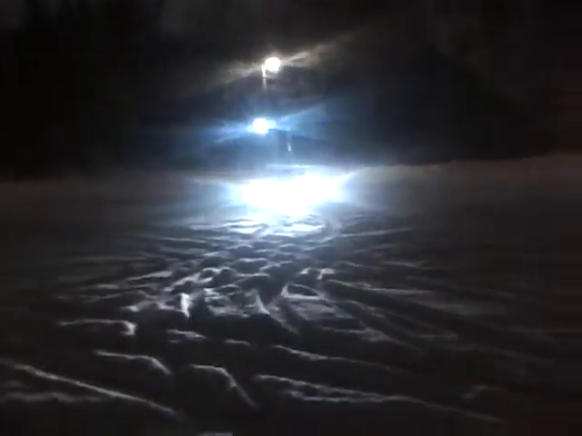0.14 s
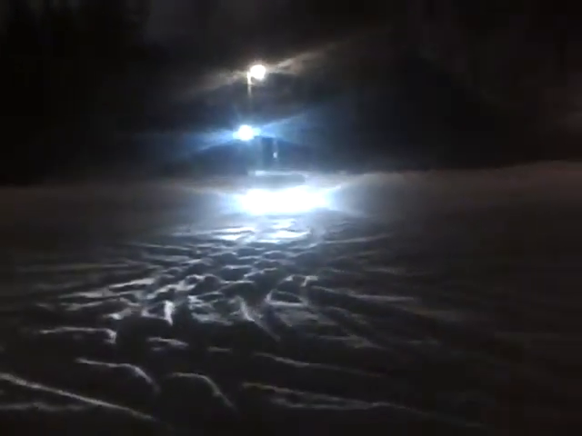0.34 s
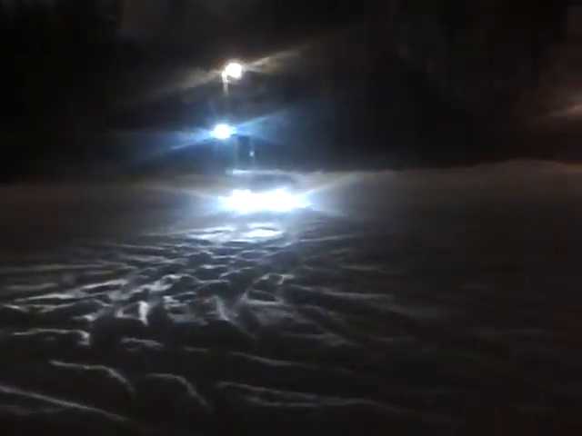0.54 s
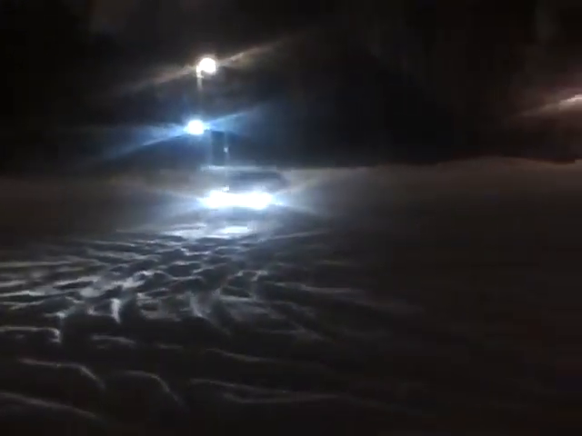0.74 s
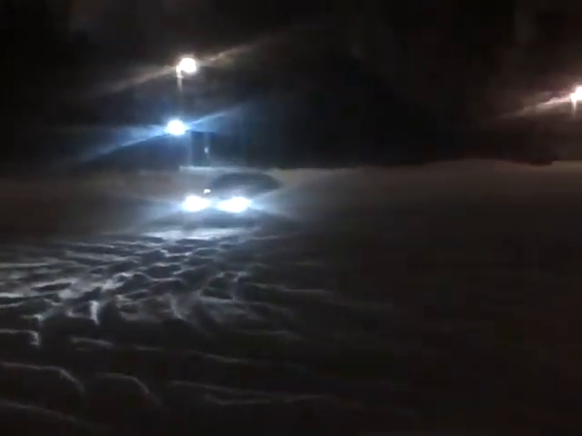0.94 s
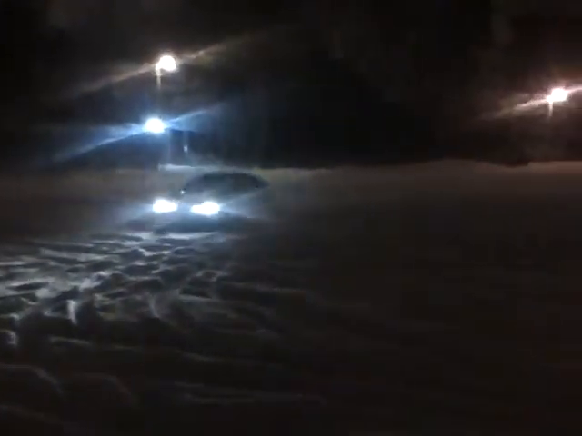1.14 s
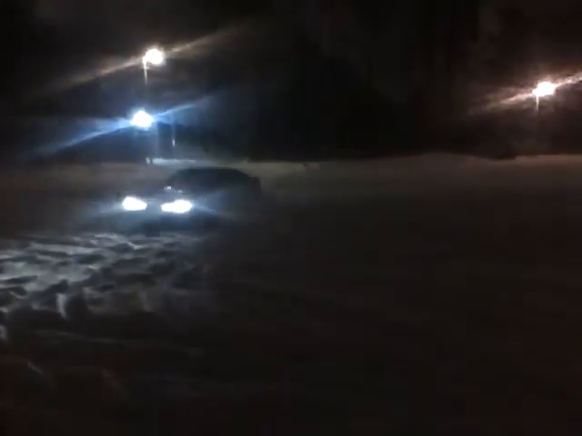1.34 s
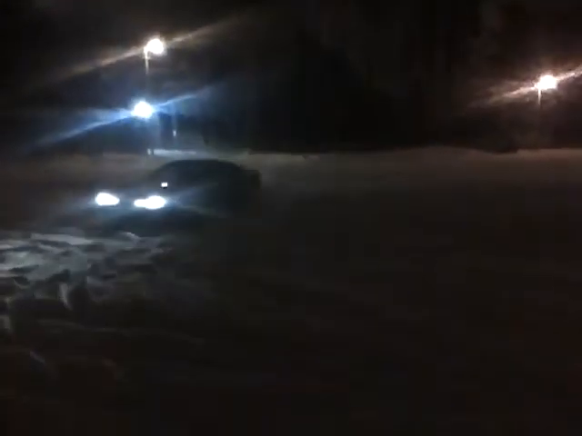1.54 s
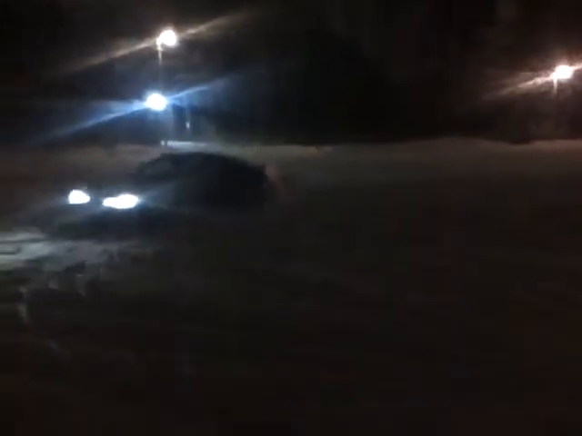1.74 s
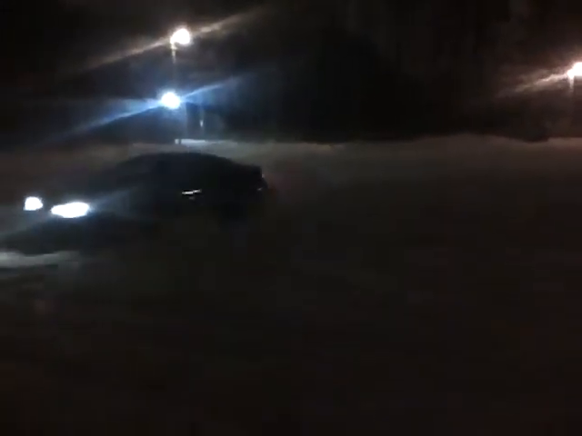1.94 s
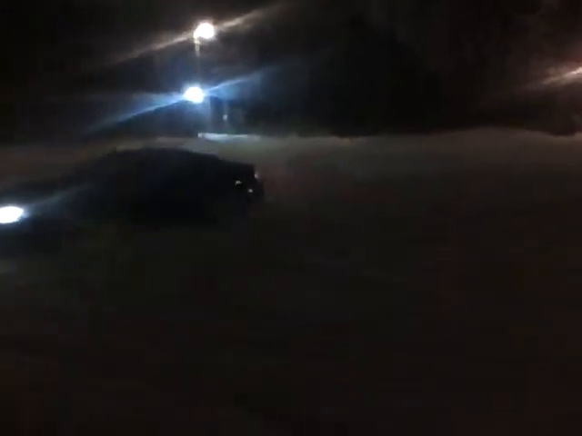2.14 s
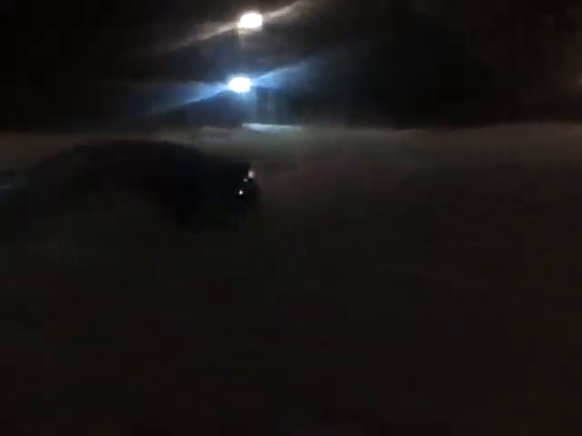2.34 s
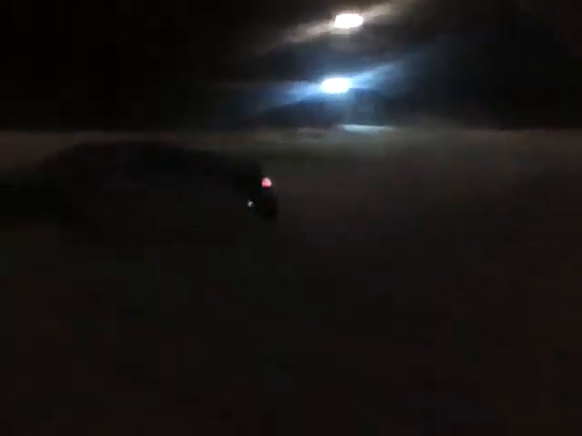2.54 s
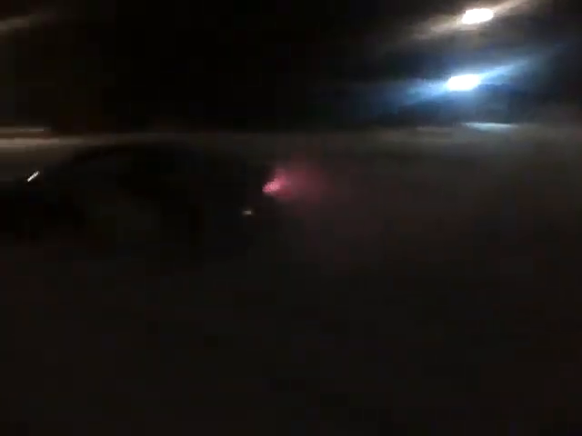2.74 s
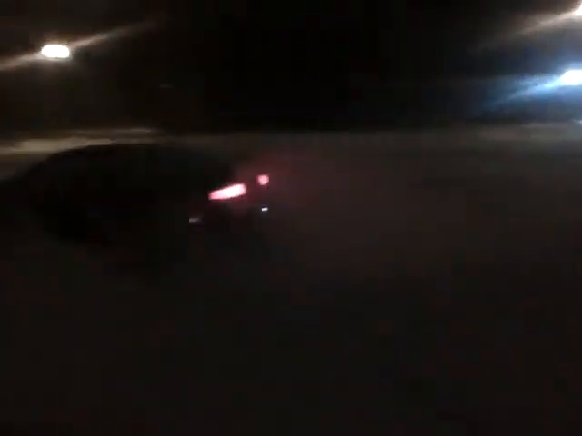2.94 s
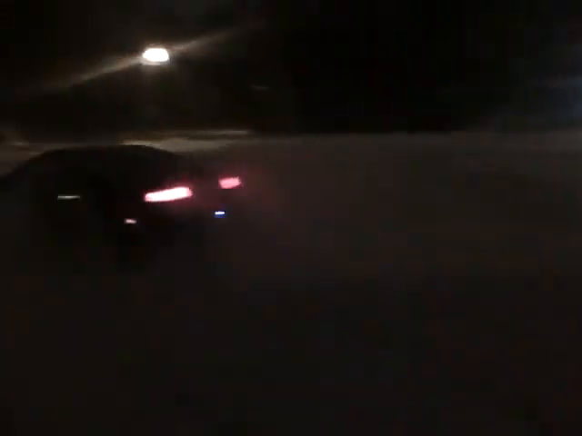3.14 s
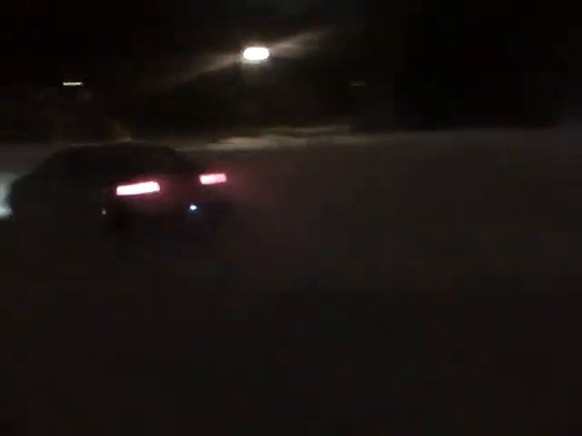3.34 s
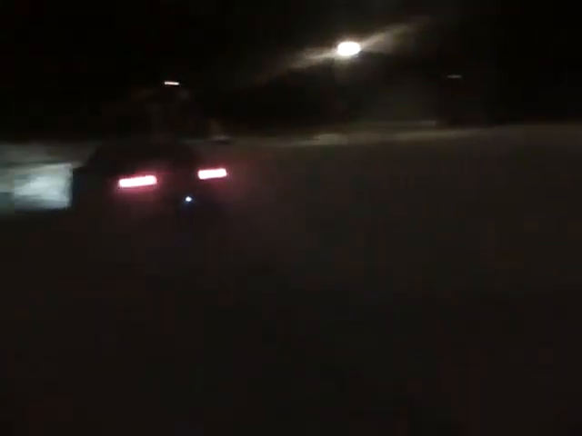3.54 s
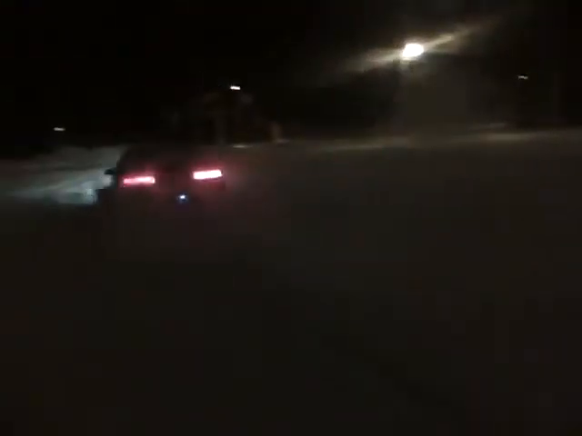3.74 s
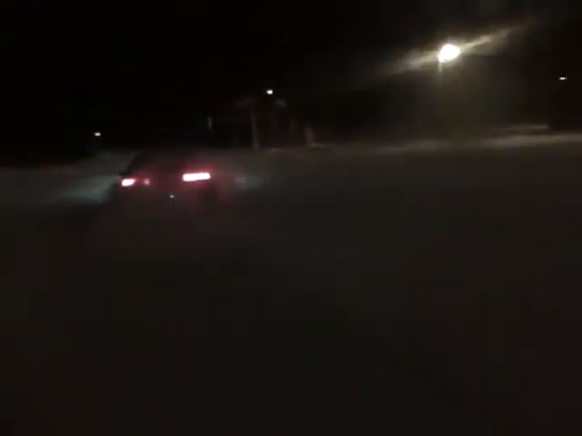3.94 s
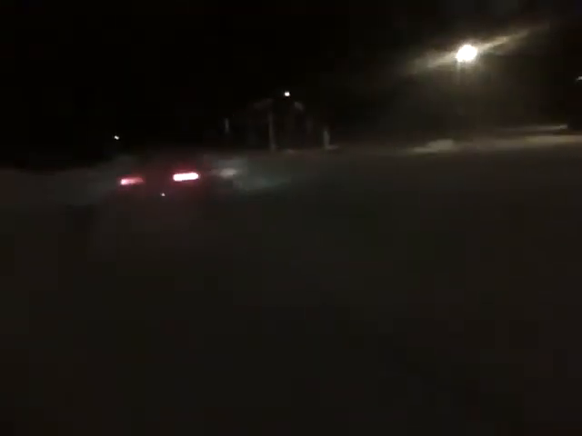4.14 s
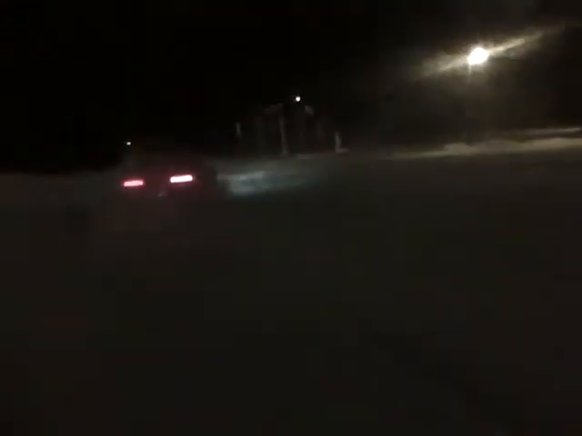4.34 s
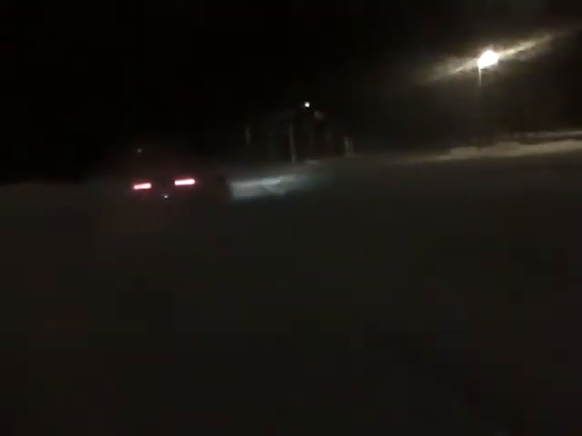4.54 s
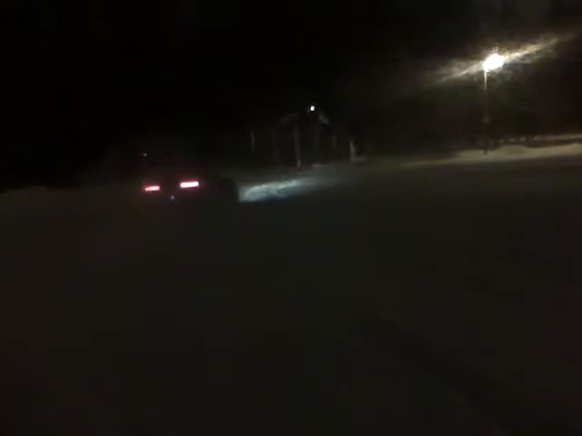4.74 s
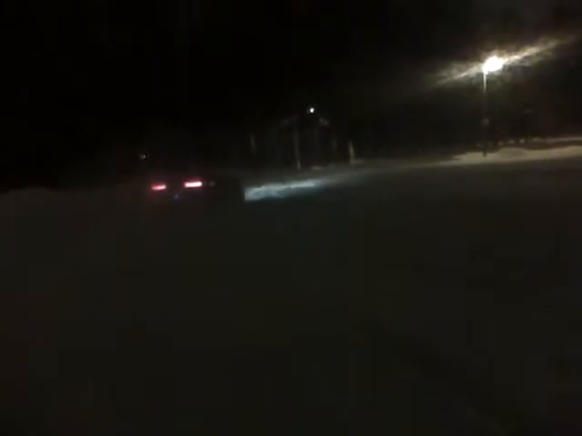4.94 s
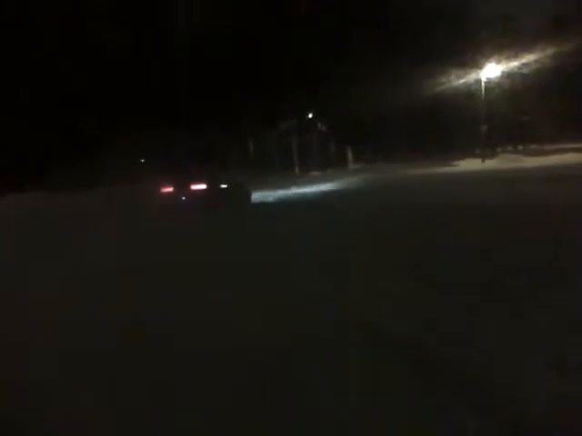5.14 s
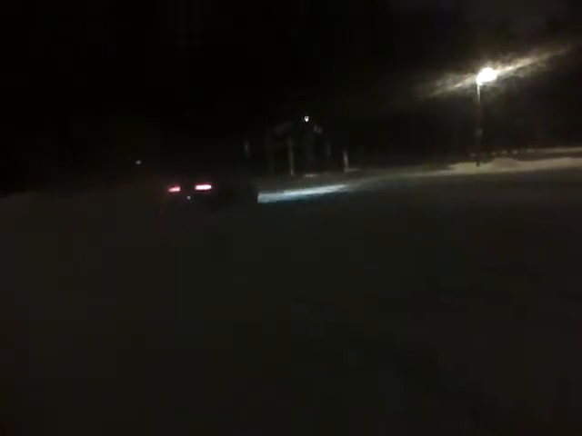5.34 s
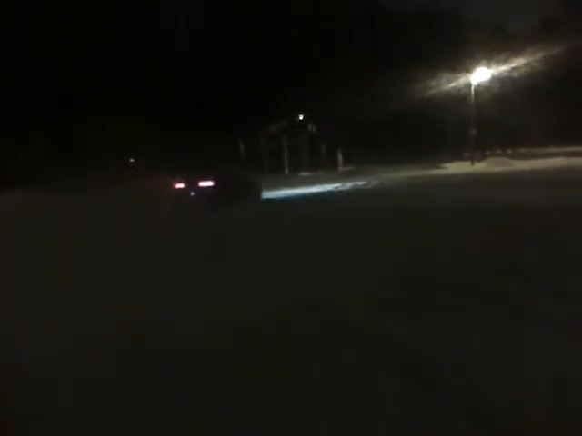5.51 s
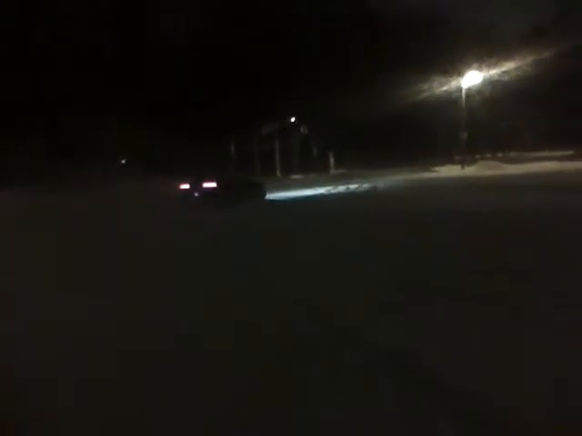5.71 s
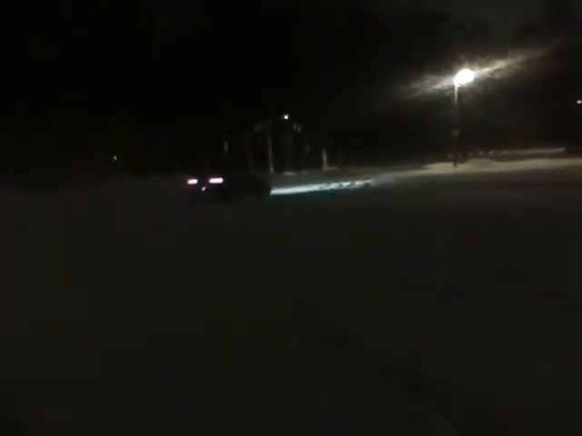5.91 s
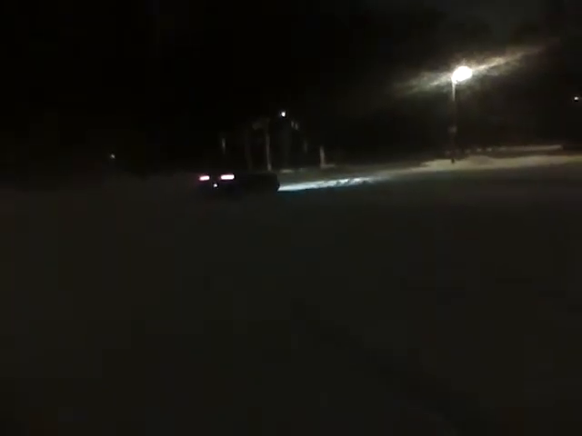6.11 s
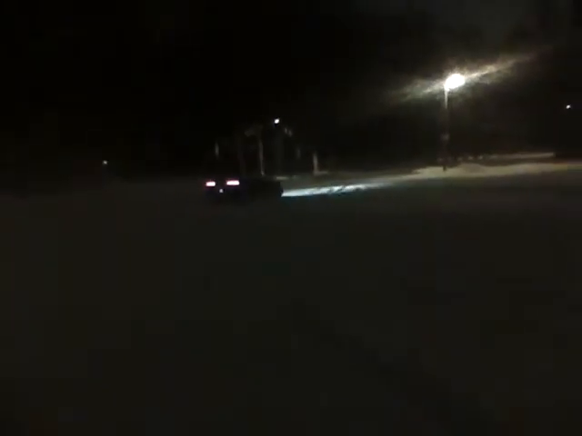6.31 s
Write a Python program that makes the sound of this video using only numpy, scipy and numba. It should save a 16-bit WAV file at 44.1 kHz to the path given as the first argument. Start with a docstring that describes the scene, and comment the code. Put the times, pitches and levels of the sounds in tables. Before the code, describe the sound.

Uneven four-cylinder engine hum climbs with roaring tyre hiss, sags to a deep raspy exhaust drone, flutters its turbo and dwindles away.

```python
"""An uneven exhaust hum under a steady microphone hiss: a turbocharged four-cylinder car on a snowy lot at
night, heard nose on, then tail on, then away. Multiples of the firing rate make the hum, which stumbles and
scatters off throttle; noise puffed once a firing rings as exhaust rasp and as the hiss of intake and spinning
tyres. Chopped noise in a moving band is the turbo whistle; soft thumps and small ticks come singly.
Low rumble lies behind, and a small microphone colours it all."""
import sys
import numpy as np
from scipy import signal
from scipy.fft import rfft, irfft
from scipy.io import wavfile
from scipy.ndimage import uniform_filter1d
from numba import njit

SR = 44100
rng = np.random.default_rng(int(sys.argv[2]) if len(sys.argv) > 2 else 0)


def inscribe(sig):
    """Save sig as 16-bit PCM at rate SR to the path in sys.argv[1].

    A 1-D sig is mono; a 2-D sig holds one channel per row.
    Samples are clipped to [-1, 1] before scaling.
    """
    pcm = np.round(np.clip(np.atleast_2d(sig).T, -1, 1) * 32767)
    wavfile.write(sys.argv[1], SR, pcm.astype(np.int16))


N = 285327
LIFT_S = 4.57  # the throttle shuts

# Partials of the hum, as multiples of the firing rate.
MULTIPLES = (.5, 1, 1.5, 2, 2.5, 3, 4)
# Weak or strong firings. Each row: time in seconds, change of strength as a share of the normal one,
# strength of the thump in relative dB.
STUMBLES = [(1.799, -0.98, -25), (1.813, 0.9, -26), (1.823, -1.1, -21), (1.829, .6, -36),
            (1.844, -0.76, -37), (2.435, 0.16, -32), (2.446, -0.46, -31), (2.457, 0.79, -26),
            (2.472, -0.42, -39), (2.479, -0.18, -29), (2.491, 0.37, -47), (2.51, -0.83, -37),
            (2.542, 0.94, -23), (4.915, 0.3, -34), (5.162, 0.61, -38), (5.3, 0.6, -41),
            (6.063, 0.83, -39.5)]
# Voices of the engine. Each holds: seven levels in dB over the hum, one per multiple, before the pipe;
# unevenness 0-1; rasp in dB over the exhaust gas; fine hiss in dB over the intake roar.
NOSE_ON = (-65, -0.5, -15.5, -12, -35, -29.5, -44.5, 0.2343, 0, 1.8)
PULLING = (-16.5, -1.5, -23.5, -13, -23, -18.5, -20.5, 0.43, -9.5, -0.5)
SPINNING = (-10, -1.7, -6.5, -9.5, -33, -22, -42, 0.46, -0.7, -0.5)
STUMBLING = (-6, -2, -14.5, -24, -38, -42, -38, 0.65, -1.2, 0.8)
SLOWING = (-32, -1.5, -19.5, -13.5, -26.5, -32, -43, 0.2, -1, -.2)
LIFTING = (-30, -2.5, -12.5, -10.5, -30, -14.5, -39, 0.32, -4, -2.5)
FADING = (-22, -1, -7, -7, -10, -27, -16.5, 0.48, -7, -1)
TAIL_ON = (-26, -6.5, -13, -3.5, -14.5, -14.5, -29.5, 0.14, 1, -6.5)
TAIL_FAR = (-41, -7.5, -13, -3.5, -16.5, -13.5, -25, 0.17, -6, -11.5)
COASTING = (-30, -2, -8, -3.5, -7.5, -13.5, -54, 0.38, -4, -4)


def undb(db):
    """Gain of a level in dB."""
    return 10 ** (np.asarray(db) / 20)


def unit(x):
    """Scaled to rms 1."""
    return x / np.sqrt(np.mean(x ** 2))


def curves(table):
    """Columns of a table, joined by straight lines in time."""
    s, *columns = np.transpose(table)
    return [np.interp(np.arange(N) / SR, s, column) for column in columns]


@njit
def svf(x, hz, width):
    """State-variable band-pass with a moving centre, gain 1 at the centre."""
    y, band_state, low_state = np.empty(len(x)), 0., 0.
    for i in range(len(x)):
        g, damping = np.tan(np.pi * hz[i] / SR), width / hz[i]
        v = (band_state + g * (x[i] - low_state)) / (1 + g * (g + damping))
        band_state = 2 * v - band_state
        low_state = low_state + 2 * g * v
        y[i] = damping * v
    return y


def band(x, hz, width_hz):
    """A resonance applied twice for steep skirts; the width is that of one pass."""
    hz = hz * np.ones(N)
    once = svf(x + 1e-18, hz, float(width_hz))
    return svf(once, hz, float(width_hz))


def ring(x, modes):
    """Sound through a set of resonances of alternating sign, rms 1."""
    total = np.zeros(N)
    for k, (hz, width_hz, db) in enumerate(modes):
        total += (-1) ** k * undb(db) * unit(band(x, hz, width_hz))
    return unit(total)


def noise():
    """White noise."""
    return rng.standard_normal(N)


def walk(rate):
    """Random levels held 1 / rate s and smoothed twice; spread about 0.65."""
    k = int(SR / rate)
    held = np.repeat(rng.standard_normal(N // k + 1), k)
    return 0.95 * uniform_filter1d(uniform_filter1d(held, k), k)[:N]


def clicks(times, sizes):
    """Silence with single clicks."""
    out = np.zeros(N)
    out[(np.asarray(times) * SR).astype(int)] = sizes
    return out


def firing_starts(cycle):
    """One where a new firing begins, else zero."""
    return np.diff(cycle, prepend=0)


def hum(turns, levels_db, uneven):
    """Multiples of the firing rate; each firing has its own strength and timing, and misfires leave holes."""
    # Silencer modes. Each row: centre in Hz, width in Hz, relative level in dB.
    burble_modes = [(127.45, 175, -7), (270, 250, -11), (353, 113, -7.5)]
    t = np.arange(N) / SR
    chance = rng.standard_normal((1200, 2))
    strength = 1 + 0.37 * uneven * np.interp(turns, np.arange(1200), chance[:, 0])
    late = 0.09 * uneven * np.interp(turns, np.arange(1200), chance[:, 1])  # in firings
    for s, change, _ in STUMBLES:
        strength = strength * (1 + change * np.exp(-((t - s) / 0.0031) ** 2))
    # off throttle the cylinders keep no fixed pattern, so the half multiples fade and smear
    pattern = np.where(t < LIFT_S, 1, .4 * walk(30))
    tone = np.zeros(N)
    for m, db in zip(MULTIPLES, levels_db):
        # each multiple leaves the pipe with its own phase
        partial = np.cos(2 * np.pi * m * (turns + late) - 0.83 * m ** 2)
        tone += undb(db) * (pattern if m % 1 else 1) * partial
    # uneven running also lets the hum swell and sag
    strength = strength * undb(5 * np.clip(uneven, 0, .25) * walk(12))
    # and firings of random strength burble in the silencer
    cycle = np.floor(turns).astype(int)
    burble = ring(firing_starts(cycle) * chance[cycle, 0], burble_modes)
    return np.sqrt(2) * strength * tone + 0.54 * uneven * undb(levels_db[3]) * burble


def firing_puffs(cycle, turns):
    """Gas escapes in decaying puffs, one a firing, slightly stronger every other firing on average."""
    size_db = 3.4 * rng.standard_normal(1200) - 0.32 * (np.arange(1200) % 2)
    return undb(size_db)[cycle] * np.exp(-(turns % 1) / .3)


def firing_pulses(cycle, turns, lopsided):
    """Pressure clicks, one a firing; the four cylinders reach the pipe unevenly."""
    # Each row, one cylinder: strength in dB, lateness in firings when strong and weak alternate fully.
    cylinders = [(0, 0), (-1, .06), (0, .12), (-2, .18)]
    lopsided = np.clip(lopsided, 0, 1)
    pulses = firing_starts(cycle) * undb(.8 * rng.standard_normal(1200)[cycle])
    pulses = pulses * (1 + lopsided * (-1) ** cycle)
    at = np.flatnonzero(pulses)[1:-1]
    own_db, late = np.transpose(cylinders)[:, cycle[at] % 4]
    rate_hz = np.gradient(turns)[at] * SR
    return clicks(at / SR + late * lopsided[at] / rate_hz, pulses[at] * undb(own_db))


def tailpipe(puff, pulses, buzz_db, bark_db):
    """Puffed gas noise barks in the tailpipe, and the pulses ring the pipe to a buzz."""
    # Both, each row: centre in Hz, width in Hz, relative level in dB.
    bark_modes = [(490, 260, -0.5), (670, 310, 1), (830, 347, 5.5)]
    buzz_modes = [(599.4, 84, 6), (714, 77, 4), (804, 88, 6.5), (924, 51, -0.5), (1280, 310, -1)]
    bark = ring((0.36 + puff) * noise(), bark_modes)
    return undb(bark_db) * bark + undb(buzz_db) * ring(pulses, buzz_modes)


def rasp(puff, pulses):
    """Gas noise, swelling with each puff, and pulses in two higher resonances."""
    # Each row: centre in Hz, width in Hz, relative level in dB.
    rasp_modes = [(1288, 420, 8), (1654, 460, 1.5)]
    return ring((1.9 + puff) * noise(), rasp_modes) + .5 * ring(pulses, rasp_modes)


def intake_roar(puff, pulses):
    """Roar of intake and tyres: wavering noise, swelling with each puff, and pulses in resonances."""
    # Each row: centre in Hz, width in Hz, relative level in dB.
    intake_modes = [(2091, 225, 1), (2325, 166, -1), (2610, 335, -2.5)]
    roar = ring((0.87 + puff) * undb(3.3 * walk(22.1)) * noise(), intake_modes)
    return roar + .4 * ring(pulses, intake_modes)


def fine_hiss(puff):
    """The treble of intake and tyres: wavering broad noise, barely chopped by the firings."""
    # Each row: centre in Hz, width in Hz, relative level in dB.
    fine_modes = [(3090, 1200, 3), (4320, 2700, -2.5), (5900, 2950, 0.5), (10170, 4300, -11)]
    return ring((7.7 + puff) * undb(1.6 * walk(20)) * noise(), fine_modes)


def night():
    """Steady hiss of the microphone and a low, swelling rumble of air and town."""
    # Shape of the hiss. Each row: frequency in Hz, relative level in dB per Hz.
    hiss_shape = [(310, -26), (520, 1), (1050, -9), (1820, -8), (2170, -12.5), (2880, -11.5), (11000, -15),
                  (14300, -52), (22000, -120)]
    hiss_db, rumble_db = -59.5, -56
    hz = np.maximum(np.arange(N // 2 + 1) * SR / N, 1)
    at, db = np.transpose(hiss_shape)
    hiss = irfft(rfft(noise()) * undb(np.interp(np.log(hz), np.log(at), db)), N)
    low, upper = unit(band(noise(), 55, 90)), unit(band(noise(), 221, 135))
    rumble = undb(walk(2.78)) * (low + 2.06 * upper)
    return undb(hiss_db) * unit(hiss) + undb(rumble_db) * rumble


def thumps():
    """Unburnt charge pops softly in the silencer."""
    s, _, db = np.transpose(STUMBLES)
    push = clicks(s, undb(db))
    return 60 * (band(push, 130, 70) + 2.6 * band(push, 253, 123))


def whistle_bursts():
    """Centre in Hz and gain of the whistle: each burst rises, holds and falls."""
    # Each row: start in seconds, length in seconds, centre in Hz, relative level in dB.
    burst_rows = [(3.34, .06, 4730, -52), (3.47, 0.11, 5210, -46.5), (4.06, 0.018, 5470, -58),
                  (4.68, 0.094, 5740, -66), (4.79, 0.091, 6050, -62), (4.88, .08, 5570, -56.5),
                  (4.985, .035, 5500, -59.5), (5.055, .04, 5524, -60), (5.1, 0.13, 5280, -61.5),
                  (5.255, 0.025, 5070, -62)]
    rush_edge_s, chirp_edge_s = 0.18, 0.015  # rise and fall under boost, after the lift
    sag_hz_per_s = 1500  # fall of pitch within each burst after the lift
    t, gain = np.arange(N) / SR, np.zeros(N)
    hz = np.full(N, float(burst_rows[0][2]))
    for s, length, centre_hz, db in burst_rows:
        edge = rush_edge_s if s < LIFT_S else chirp_edge_s
        inside = np.minimum(t - s, s + length - t)  # negative outside the burst
        gain = np.maximum(gain, undb(db) * np.clip(1 + inside / edge, 0, 1) ** 2)
        since = t[t > s - edge / 2] - s - length / 2
        hz[N - len(since):] = centre_hz - (s > LIFT_S) * sag_hz_per_s * np.minimum(since, length)
    return uniform_filter1d(hz, size=400), gain


def turbo_whistle(puff):
    """Noise chopped by the firings: a broad rush under boost, thin falling chirps after the lift."""
    hz, gain = whistle_bursts()
    chopped = (.15 + puff) * noise()
    rush = unit(band(chopped, hz, 1500)) + .3 * unit(band(chopped, 1.42 * hz, 2400))
    chirp = unit(band(chopped, hz, 920))
    return gain * np.where(np.arange(N) < LIFT_S * SR, rush, chirp)


def ticks():
    """Small ticks of snow crust or hot exhaust: short decaying bursts of broad noise."""
    # Each row: time in seconds, relative level in dB.
    tick_rows = [(4.0742, -49), (4.9302, -54), (5.1882, -47), (5.285, -49.5), (5.9435, -50), (6.0595, -53),
                 (6.1589, -50), (6.2542, -55), (6.2874, -52)]
    s, db = np.transpose(tick_rows)
    tail = np.exp(-np.arange(1500) / SR / 0.011)
    envelope = np.convolve(clicks(s, undb(db)), tail)[:N]
    return 1.74 * band(envelope * noise(), 1700, 6865)


def scene():
    """The engine's course drives hum, gas, roar and whistle; thumps, ticks and the night join them."""
    # Engine speed. Each row: time in seconds, firing rate in Hz.
    revs = [(0, 125.5), (.11, 127.5), (.59, 142.6), (.72, 145), (.88, 137.4), (1.15, 125.6), (1.22, 128.7),
            (1.48, 149.6), (1.77, 174.6), (1.93, 183), (2.07, 188), (2.22, 189), (2.43, 184), (2.52, 165),
            (2.67, 147.5), (2.86, 129.5), (3.08, 123), (3.3, 120), (3.84, 115.4), (4.16, 114), (4.5, 109.7),
            (4.6, 104.5), (4.94, 88.3), (5.27, 80.3), (5.58, 77.8), (6.47, 70.3)]
    # Base levels. Each row: time in seconds, exhaust hum, exhaust gas, intake and tyre roar, all in dB.
    base_levels = [(0, -36, -59.5, -53.5), (.55, -29.5, -53, -49.5), (.9, -29, -51.5, -50.5),
                   (1.15, -28, -50, -52.5), (1.43, -22.5, -47, -45), (1.58, -23, -38.5, -43.5),
                   (1.78, -26, -38, -39.5), (2.0, -27.5, -42, -40), (2.22, -24.5, -39, -39),
                   (2.41, -28, -43, -40.5), (2.46, -24, -43.5, -43.5), (2.57, -23.5, -44.5, -44),
                   (2.8, -23.5, -45.5, -49), (2.97, -22, -42, -47), (3.2, -20, -36, -46),
                   (3.55, -19, -39, -44), (3.8, -20.5, -41.5, -52.5), (3.95, -20, -43.5, -54),
                   (4.07, -22, -44, -48), (4.48, -27, -49, -53.5), (4.62, -30, -57, -59.5),
                   (4.96, -31, -61, -62.5), (5.6, -34, -67.5, -68), (6.1, -33.5, -63, -67.5),
                   (6.47, -36, -71, -68.5)]
    # When each voice is heard in full, blending between. Each row: time in seconds, voice,
    # share of clean pulses in the exhaust gas 0-1.
    story = [(0.0, NOSE_ON, .25), (1.3, NOSE_ON, .4), (1.58, PULLING, .7), (1.78, PULLING, .7),
             (1.93, SPINNING, .35), (2.42, SPINNING, .45), (2.46, STUMBLING, .2), (2.54, STUMBLING, .2),
             (2.64, SLOWING, .2), (2.85, SLOWING, .3), (3.08, TAIL_ON, .6), (3.3, TAIL_ON, .6),
             (3.8, TAIL_FAR, .55), (4.5, TAIL_FAR, .65), (4.62, LIFTING, .3), (4.94, COASTING, .3),
             (5.85, COASTING, .3), (6.1, FADING, .3)]
    # The exhaust pipe's effect on the hum. Each row: frequency in Hz, gain in dB.
    pipe = [(60, -9.5), (90, 1), (190, 3), (245, 2.5), (290, -4.5), (400, -3.5), (520, 2.5), (680, 5.5)]
    hz, = curves(revs)
    turns = np.cumsum(hz) / SR  # firings so far
    cycle = np.floor(turns).astype(int)
    hum_db, gas_db, intake_db = curves(base_levels)
    *orders_db, uneven, rasp_db, fine_db, clean = curves([(s, *voice, share) for s, voice, share in story])
    buzz_db, bark_db = 10 * np.log10(clean), 10 * np.log10(1 - clean)
    at, pipe_db = np.transpose(pipe)
    levels_db = []
    for m, db in zip(MULTIPLES, orders_db):
        levels_db.append(hum_db + db + np.interp(np.log(m * hz), np.log(at), pipe_db))
    # the stronger the 3/2 multiple beside the firing rate, the more strong and weak pulses alternate
    lopsided = 1.25 * undb(levels_db[2] - levels_db[1])
    puff = firing_puffs(cycle, turns)
    pulses = firing_pulses(cycle, turns, lopsided)
    car = hum(turns, levels_db, uneven)
    car += tailpipe(puff, pulses, gas_db + buzz_db, gas_db + bark_db)
    car += undb(gas_db + rasp_db) * rasp(puff, pulses)
    car += undb(intake_db) * intake_roar(puff, pulses)
    car += undb(intake_db + fine_db) * fine_hiss(puff)
    car += thumps() + turbo_whistle(puff)
    return (car + night() + ticks())[None]


def record(dry):
    """The small microphone's housing dips two bands; the recorder cuts the deep bass and the top."""
    # Each row: centre in Hz, width in Hz, depth 0-1.
    housing_dips = [(1072.4, 930, 0.18), (1795, 51, 0.41)]
    low_hz, top_hz = 34.5, 11100
    dry = signal.sosfilt(signal.butter(2, low_hz, "high", fs=SR, output="sos"), dry)
    for hz, width_hz, depth in housing_dips:
        dry = dry - depth * svf(dry[0], hz * np.ones(N), float(width_hz))
    return signal.sosfilt(signal.ellip(10, .2, 70, top_hz, fs=SR, output="sos"), dry)


dry = scene()
out = record(dry)
inscribe(out)
```